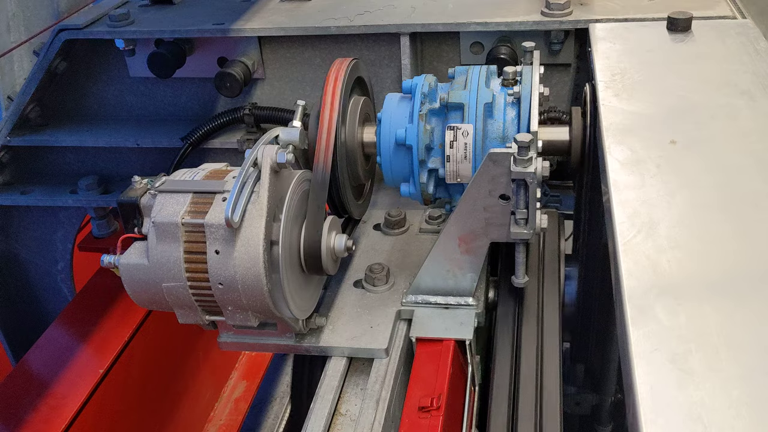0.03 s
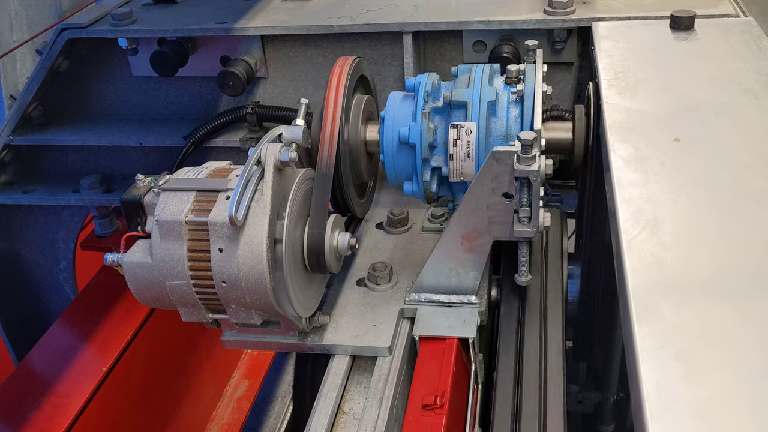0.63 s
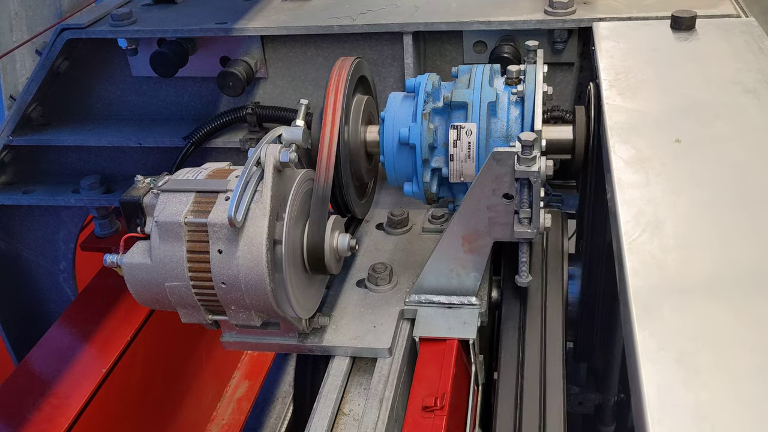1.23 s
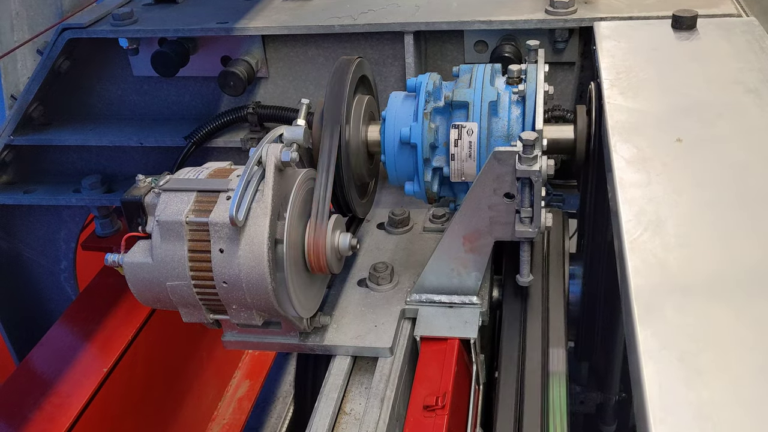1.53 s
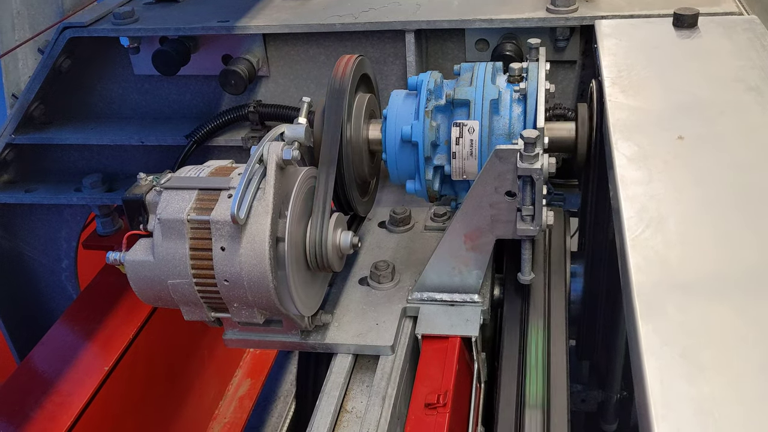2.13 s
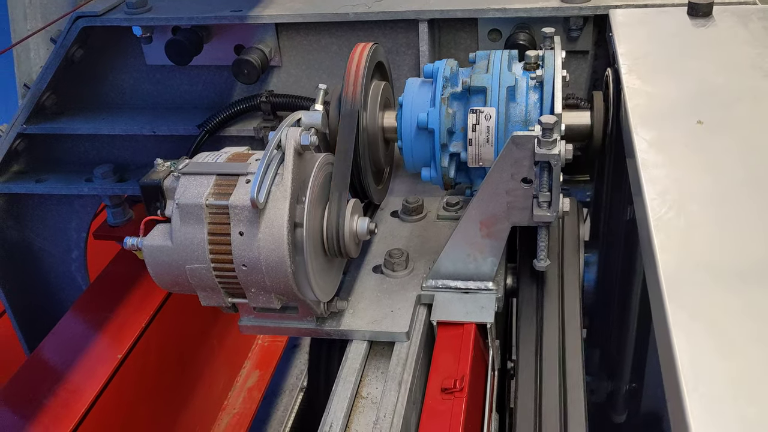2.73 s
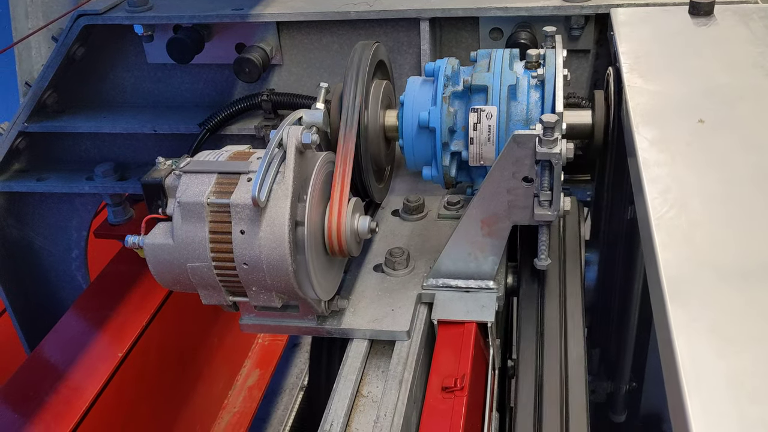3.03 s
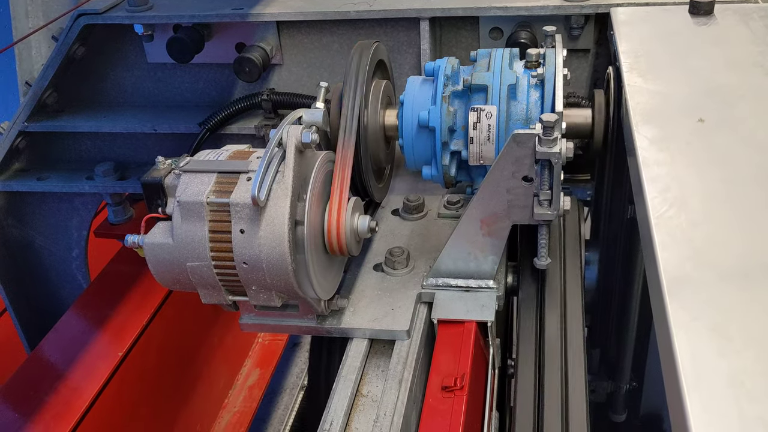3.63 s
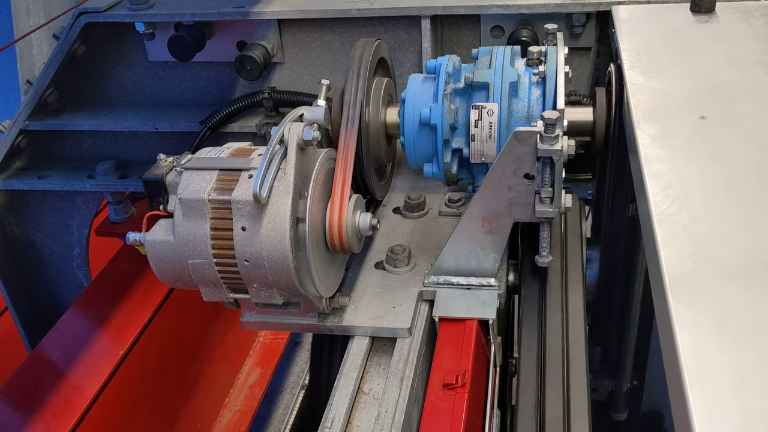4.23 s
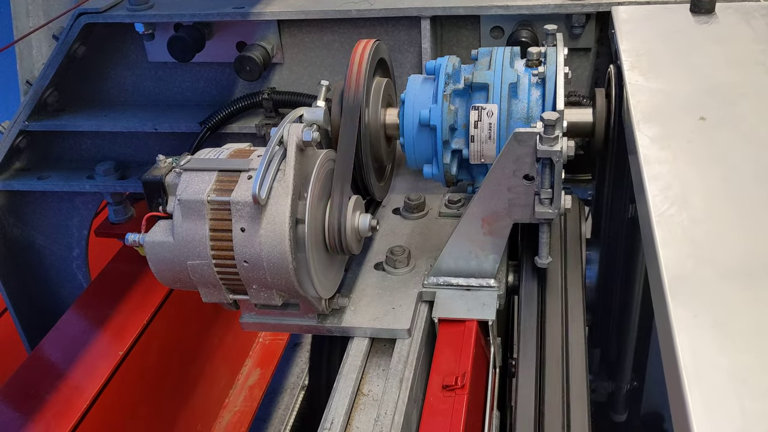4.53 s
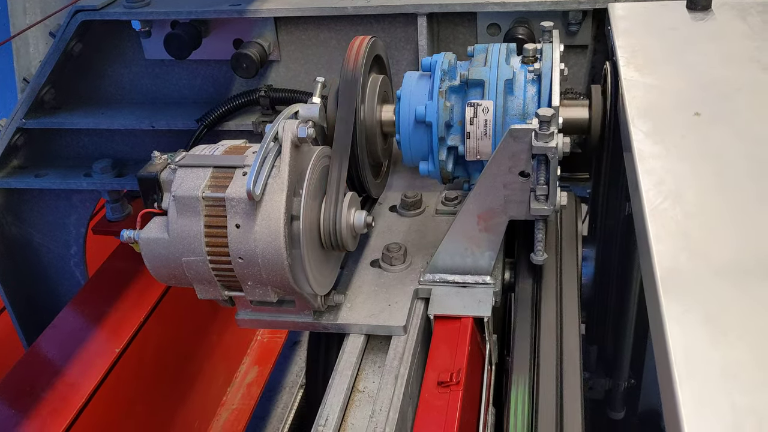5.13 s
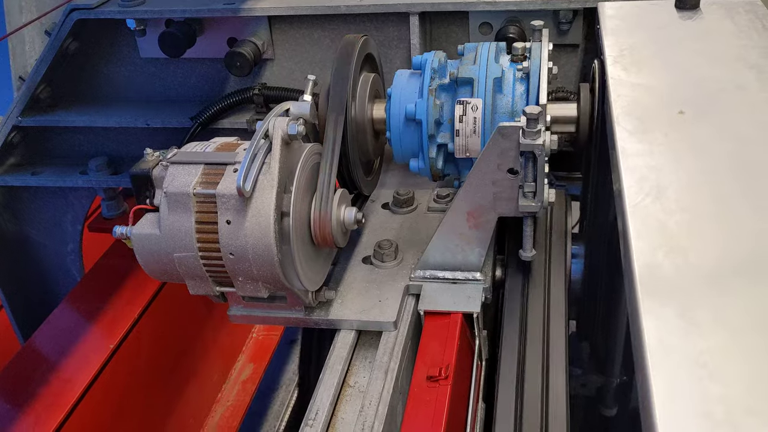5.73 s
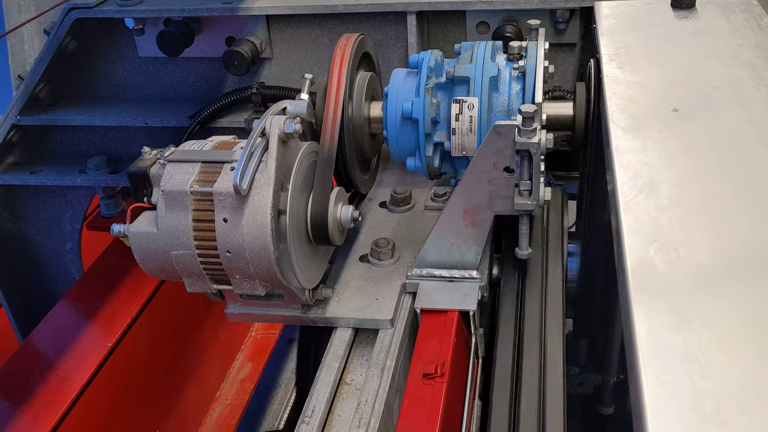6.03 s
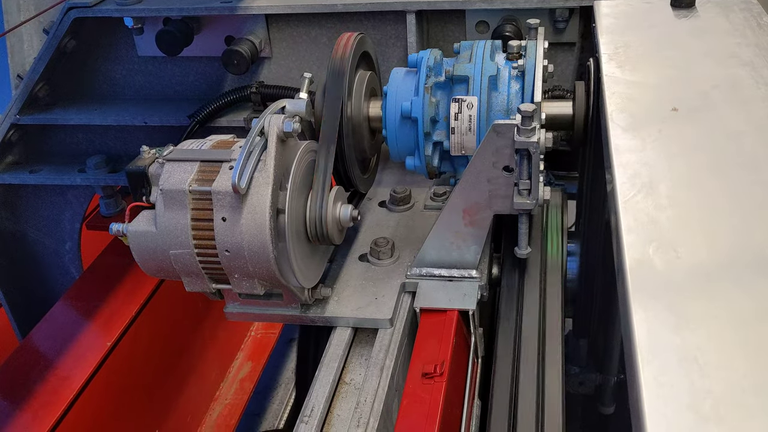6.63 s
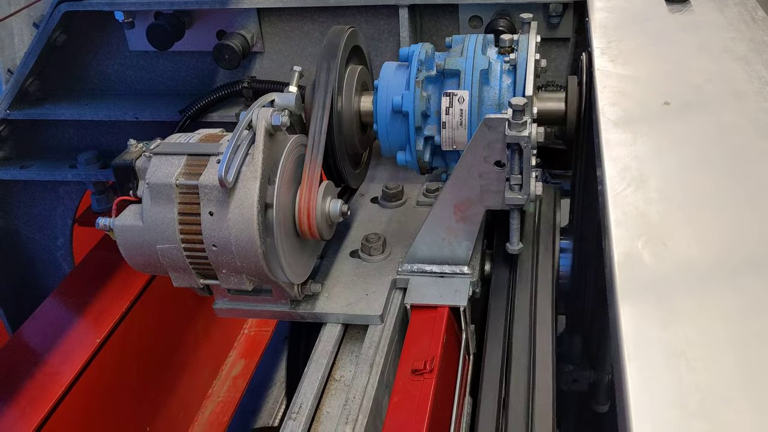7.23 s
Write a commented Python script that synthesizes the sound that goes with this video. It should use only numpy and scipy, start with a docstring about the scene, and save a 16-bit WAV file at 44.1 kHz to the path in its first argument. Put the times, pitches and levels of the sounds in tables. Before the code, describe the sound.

A belt-driven alternator runs close by with a loud, steady fan roar, hum, whine and fluttering gear squeal, its steel frame jolting once.

```python
"""A lift drive in a steel frame turns an alternator through a gearbox and a belt, close to a phone.
The sound cuts in at 0.7 s: the alternator's fan roars and sings, the drive hums, gear teeth and rotor
poles whine, and a rough gear squeal flutters with each turn of the pulley shaft. From 3.5 s the frame
shudders in spells while the machine speeds up a little. Near 5 s the frame jolts, which makes the phone
turn its gain down; the gain recovers and the machine runs on."""
import sys
import numpy as np
from scipy import signal
from scipy.fft import rfft, irfft
from scipy.io import wavfile
from scipy.ndimage import uniform_filter1d

SR = 44100
rng = np.random.default_rng(int(sys.argv[2]) if len(sys.argv) > 2 else 0)


def materialize(psi):
    """Save the field psi as 16-bit PCM at rate SR to the path in sys.argv[1].

    A 1-D psi becomes a single channel; in a 2-D psi each row is a channel.
    """
    bounded = np.clip(np.atleast_2d(psi).T, -1, 1)
    quanta = np.round(bounded * 32767).astype(np.int16)
    wavfile.write(sys.argv[1], SR, quanta)


N = 321489
TIME = np.arange(N) / SR
FREQ = np.fft.rfftfreq(N, 1 / SR) + 1e-6

# An order is a multiple of the alternator's speed. Pan is left minus right; lead is left ahead of right.
# The alternator's speed. Each row: time in seconds, turns per second.
SPEED = [(.7, 130.2), (1.2, 130), (1.75, 129.1), (2.2, 129.6), (2.8, 129.6), (5, 131.3), (5.35, 130.3),
         (5.65, 132), (6.2, 132.8), (6.7, 132.4), (7.29, 132.6)]
BELT_WANDER, BELT_CHANGES_PER_S = .0013, 14  # the wander is a share of the speed

# Base spectra of the fan's roar and hiss. Each row: frequency in Hz, density in dB per Hz.
ROAR_SPECTRUM = [(20, -88), (70, -51.5), (130, -55), (250, -50), (420, -54), (700, -54), (1300, -49),
                 (1900, -49.5), (2500, -57.5), (4000, -66.5), (16000, -100)]
HISS_SPECTRUM = [(500, -82), (2000, -62.5), (3500, -56.5), (4400, -59), (5300, -59.5), (5900, -62),
                 (7200, -61), (8200, -65.5), (10300, -67), (12000, -71), (15800, -74.5)]
# Resonances of housing and frame. Each row: frequency in Hz, width in Hz, boost in dB.
HOUSING_MODES = [(513, 10, 7.5), (693, 120, 9.5), (866, 103, 4.5), (1028.5, 82, 12.5), (1105, 37, 4.5),
                 (1270, 80, 2), (1826, 79, 2.5)]
# Slow changes of level. Each row: time in seconds, gain of the roar in dB, of hiss and gear squeal in dB.
AIR_GAINS = [(.8, -3, -3.5), (1.05, 1, 1), (1.7, 0.3, 0.15), (3.8, -0.5, 0), (4.4, -1.1, -0.8),
             (5.7, 0.3, 1.2), (6.4, -1.7, -0.3), (7.29, -0.3, 0.7)]
# Balance of the air noise. Each row: frequency in Hz, pan in dB.
AIR_PAN = [(100, 0), (330, 2.5), (520, -1.5), (700, -5), (950, 1.9), (1250, 3), (1650, -1), (2050, 4.5),
           (2600, -2), (4000, -3), (7000, -1), (15000, -.5)]
# Likeness of noise at the two microphone ports. Each row: frequency in Hz, coherence from 0 to 1.
COHERENCE = [(70, 1), (180, 0.78), (300, 1), (440, 0.41), (700, 0.95), (950, 0.25), (2000, 0.077),
             (5000, 0.13), (9000, 0.031)]

# Whines of the gear mesh (first row) and the poles. Each row: order, loudest speed in turns per second.
WHINE_ORDERS = [(26.13, 131.6), (12, 130.8), (24, 130.8), (30, 130.8), (36, 132.6)]
# The same whines. Each row: level at that speed in dB, half width in turns per second, waver in dB,
# pan in dB, share of the sway, lead in radians, added lead in radians per dB of sway.
WHINE_VOICES = [(-26.6, 4, 1.8, 0, .1, 2.4, .05), (-20.7, 8, 2.4, 0, .9, -2.35, 0),
                (-29.8, 1.8, 1.5, 2, .3, 2.35, .05), (-39, 1.5, 2, -1, .1, 1, 0),
                (-31, 4.4, 2.5, -5.5, .1, -.85, -.1)]
# Sway of the whines as the phone drifts through standing waves. Each row: time in seconds, pan in dB.
SWAY = [(.7, -0.5), (1.4, 9.5), (2.7, 7), (3.7, 4), (4.5, -10.5), (5.3, 0.5), (6.7, -9), (7.29, -15)]

# Gear mesh harmonics from the second up. Each row: base level of the tone in dB, of the rasp in dB,
# width of the rasp's resonance in Hz, pan in dB, lead in radians.
MESH_HARMONICS = [(-27.5, -25.5, 770, -1.5, -1.5), (-38, -31.5, 1200, -2.5, -1.1),
                  (-60, -36, 1700, 0, -2.5)]
# Course of the gear squeal. Each row: time in seconds, gain in dB.
SQUEAL_GAIN = [(.7, 3.5), (1.5, 1), (2.5, 2), (3.3, 0.5), (4.2, -1), (4.9, -1.5), (5.6, -3.5), (6.5, -3),
               (7.29, -1.5)]
PULLEY_ORDER, SHAFT_ORDER, MESH_ORDER, RASP_SPACING_HZ = .1925, .77, 26.13, 3435

# The shaft's hum. Each row: time in seconds, level in dB.
SHAFT_HUM = [(.7, -31.5), (1.15, -30), (1.4, -23.5), (1.75, -31.5), (2.45, -33), (2.75, -24), (3.1, -32),
             (3.6, -26.5), (4.6, -23.5), (4.85, -22.5), (5.2, -32), (5.55, -26.5), (7.29, -29.5)]
# Two drones. Each row: order, speed in turns per second at which it meets a resonance of the frame.
DRONE_ORDERS = [(1.434, 130.3), (1.54, 132.6)]
# The same drones. Each row: level at resonance in dB, half width in turns per second, waver in dB,
# pan in dB, lead in radians.
DRONE_VOICES = [(-22.5, 2.2, 1.2, 1, -0.37), (-20.5, 1.2, 1.5, 2.5, -0.07)]
# Weaker tones of drive and fan. Each entry: an order.
WEAK_ORDERS = [.385, .52, 2.32, 3.88, 3.94, 6, 6.91, 7.74, 7.88, 10.19, 18, 25.93]
# The same tones. Each row: level in dB, pan in dB, lead in radians.
WEAK_VOICES = [(-52, -3, -3.5), (-45, 5, -1), (-35, 1.5, -1.1), (-41.5, -14, 2), (-36, -1, 0),
               (-33, 1, -0.2), (-29, 1, 0.6), (-29.5, -7, 1), (-36, 2, 0.75), (-33, -3, -0.5),
               (-32.5, 1, 4), (-37, -5.5, 2.5)]

# Jolts of the frame. Each row: start in seconds, level in dB, decay time in seconds.
JOLTS = [(4.78, -23, 0.088), (5.032, -4.5, 0.11), (5.23, -17, 0.35), (5.73, -25, 0.035)]
# Modes that the jolts excite. Each row: frequency in Hz, width in Hz, relative level in dB.
FRAME_MODES = [(110, 24, 1.5), (162, 30, 1), (237, 32, 4.5), (292, 30, -2.5), (410, 41, -4.5),
               (523, 29, 4.5), (582, 26, 1)]
# Spells of shuddering. Each row: start in seconds, length in seconds, level in dB.
SHUDDERS = [(3.498, 0.57, -29.5), (4.82, 0.22, -21), (5.038, 0.54, -20), (5.698, 0.16, -25.5),
            (6.145, 0.54, -20), (6.9, 0.49, -27)]
# Spectrum of rumble and shudders. Each row: frequency in Hz, relative level in dB.
RUMBLE_SPECTRUM = [(20, -38), (35, -18), (46, 0.5), (54, 2), (64, -3.5), (85, -8), (130, -6), (250, -10),
                   (500, -13), (2000, -68)]
JOLT_ATTACK_S, SHUDDER_ATTACK_S, SHUDDER_RELEASE_S = .02, .04, .081
RUMBLE_DB, RUMBLE_WAVER_DB = -32.5, 1.7

START_S, PORT_LAG_S, TOP_HZ = .703, .00023, 15850
CEILING_DB, REACTION_S, RECOVERY_DB_PER_S = -11.5, .023, 19


def fan_air(roar_gain_db):
    """Turbulence is broadband: it excites the housing's resonances and hisses through the cooling slots."""
    pan = balance(shape(AIR_PAN))
    housing_db = sum(db * abs(resonance(hz, width)) ** 2 for hz, width, db in HOUSING_MODES)
    roar = noise(pan * undb(shape(ROAR_SPECTRUM) + housing_db)) * undb(roar_gain_db + .5 * walk(40))
    hiss = noise(pan * undb(shape(HISS_SPECTRUM))) * undb(.5 * walk(60))
    return roar, hiss


def whines(turns, speed):
    """Periodic forces of teeth and poles radiate tones; standing waves set their balance and phase."""
    sway_db, = curves(SWAY)
    out = 0
    for (order, loudest_at), voice in zip(WHINE_ORDERS, WHINE_VOICES):
        db, half_width, waver_db, pan_db, share, lead, twist = voice
        whine = tone(order * turns, pan_db + share * sway_db, lead + twist * sway_db, waver_db, .17)
        out += undb(db) * swell(speed, loudest_at, half_width) * whine
    return out


def gear_squeal(turns):
    """Phase modulation: uneven tooth timing smears the mesh harmonics, which throb each pulley turn."""
    pulley_angle = 2 * np.pi * PULLEY_ORDER * turns
    mesh_cycles = MESH_ORDER * turns + .048 * np.sin(pulley_angle) + .033 * walk(70)
    throb_db = 1.2 * np.sin(pulley_angle) + .76 * np.sin(2 * pulley_angle) + .65 * np.sin(4 * pulley_angle)
    squeal_db, = curves(SQUEAL_GAIN)
    out = 0
    for harmonic, (tone_db, rasp_db, width, pan_db, lead) in enumerate(MESH_HARMONICS, 2):
        cycles = harmonic * (mesh_cycles + .038 * walk(700))
        teeth = tone(cycles, pan_db, lead, waver_db=-.5, scatter=.56)
        rasp_band = abs(resonance(harmonic * RASP_SPACING_HZ, width)) ** 2
        rasp = unit(noise(rasp_band)) * balance(pan_db)
        out += undb(tone_db + squeal_db) * teeth + undb(rasp_db + .57 * squeal_db) * rasp
    return out * undb(throb_db)


def hums(turns, speed):
    """Forced vibration: drive and fan-blade tones follow the shafts, and two drones swell at resonance."""
    shaft_db, = curves(SHAFT_HUM)
    out = undb(shaft_db) * tone(SHAFT_ORDER * turns, pan_db=0, lead=.08, waver_db=2.14, scatter=.15)
    for (order, loudest_at), (db, half_width, waver_db, pan_db, lead) in zip(DRONE_ORDERS, DRONE_VOICES):
        drone = tone(order * turns, pan_db, lead, waver_db, scatter=.11)
        out += undb(db) * swell(speed, loudest_at, half_width) * drone
    for order, (db, pan_db, lead) in zip(WEAK_ORDERS, WEAK_VOICES):
        out += undb(db) * tone(order * turns, pan_db, lead, waver_db=2, scatter=.2)
    return out


def frame_jolts():
    """Modal response: each jolt sets the steel frame's modes rattling, and the motion dies away."""
    shaking = sum(undb(db) * envelope(start, JOLT_ATTACK_S, 0, decay) for start, db, decay in JOLTS)
    modes = sum(undb(db) * resonance(hz, width) for hz, width, db in FRAME_MODES)
    return shaking * unit(noise(modes / (1 + (FREQ / 900) ** 4)))  # rolls off above 900 Hz


def frame_rumble():
    """Random vibration: the frame's steady rumble and its shudders add in power."""
    shudder_power = sum((undb(db) * envelope(start, SHUDDER_ATTACK_S, length, SHUDDER_RELEASE_S)) ** 2
                        for start, length, db in SHUDDERS)
    strength = np.sqrt(undb(RUMBLE_DB) ** 2 + shudder_power)
    return unit(noise(undb(shape(RUMBLE_SPECTRUM)))) * strength * undb(RUMBLE_WAVER_DB * walk(12))


def tone(cycles, pan_db, lead, waver_db, scatter):
    """Interference: reflections shift a wavering tone's phase at each port by about scatter radians."""
    left = undb(pan_db) * np.sin(2 * np.pi * cycles + lead + scatter * walk(9))
    right = np.sin(2 * np.pi * cycles + scatter * walk(9))
    return 2 * np.array([left, right]) / np.sqrt(1 + undb(2 * pan_db)) * undb(waver_db * walk(16))


def noise(spectrum):
    """Partial coherence: direct noise reaches the right port first; the room's part is uncorrelated."""
    direct, *room = rfft(rng.standard_normal((3, N))) * np.sqrt(SR / 2)
    coherence = np.clip(shape(COHERENCE), 0, 1)
    ports = np.array([direct * np.exp(-2j * np.pi * FREQ * PORT_LAG_S), direct])
    return irfft(spectrum * (np.sqrt(coherence) * ports + np.sqrt(1 - coherence) * np.array(room)), N)


def resonance(hz, width):
    """Frequency response of a damped oscillator, 1 at its centre."""
    return 1 / (1 + 1j * (FREQ ** 2 - hz ** 2) / (FREQ * width))


def swell(speed, loudest_at, half_width):
    """Resonance curve: the gain of a tone as the speed carries it through a peak."""
    return 1 / (1 + ((speed - loudest_at) / half_width) ** 2)


def envelope(start, attack, hold, decay):
    """Linear rise, with exponential decay from hold seconds after the start."""
    return np.clip((TIME - start) / attack, 0, 1) * np.exp(-np.maximum(TIME - start - hold, 0) / decay)


def walk(rate):
    """Random modulation: ramps between rate new values a second, with a spread near 1."""
    step = max(int(SR / rate), 2)
    stairs = np.repeat(rng.standard_normal(N // step + 2), step)
    return 1.295 * uniform_filter1d(stairs, step)[step // 2:step // 2 + N]


def curves(table):
    """Linear interpolation in time of each column after the first."""
    seconds, *columns = np.transpose(table)
    return [np.interp(TIME, seconds, column) for column in columns]


def shape(points):
    """Interpolation of (Hz, value) points on a log-frequency axis."""
    hz, value = np.transpose(points)
    return np.interp(np.log(FREQ), np.log(hz), value)


def balance(pan_db):
    """A level difference split evenly into left and right gains."""
    return undb(pan_db * np.array([[1], [-1]]) / 2)


def unit(x):
    """Normalisation to rms 1."""
    return x / np.sqrt(np.mean(x ** 2))


def undb(db):
    """Decibels to amplitude ratio."""
    return np.exp(np.asarray(db) * np.log(10) / 20)


def gain_control(x):
    """Limiting: the phone's gain falls by the running level's excess over a ceiling, then recovers."""
    memory = np.exp(-1 / (REACTION_S * SR))
    power = signal.lfilter([1 - memory], [1, -memory], np.mean(x ** 2, axis=0))
    excess_db = 10 * np.log10(np.maximum(power / undb(CEILING_DB) ** 2, 1))
    recovered_db = RECOVERY_DB_PER_S * TIME
    reduction_db = np.maximum.accumulate(excess_db + recovered_db) - recovered_db
    return x * undb(-reduction_db)


def scene():
    """Superposition of all sources; one speed, wandering slightly with the belt, drives every tone."""
    speed, = curves(SPEED)
    turns = np.cumsum(speed * (1 + BELT_WANDER * walk(BELT_CHANGES_PER_S))) / SR
    roar_gain_db, treble_gain_db = curves(AIR_GAINS)
    roar, hiss = fan_air(roar_gain_db)
    tones = hums(turns, speed) + whines(turns, speed)
    treble = (gear_squeal(turns) + hiss) * undb(treble_gain_db)
    return roar + tones + treble + frame_rumble() + frame_jolts()


def record(dry):
    """Limiting, soft saturation and a low-pass filter in the phone; the sound cuts in abruptly."""
    held = gain_control(dry)
    rounded = held / (1 + held ** 8) ** (1 / 8)
    lowpass = signal.ellip(12, .1, 80, TOP_HZ, fs=SR, output="sos")
    return signal.sosfilt(lowpass, rounded * (TIME >= START_S))


dry = scene()
out = record(dry)
materialize(out)
```